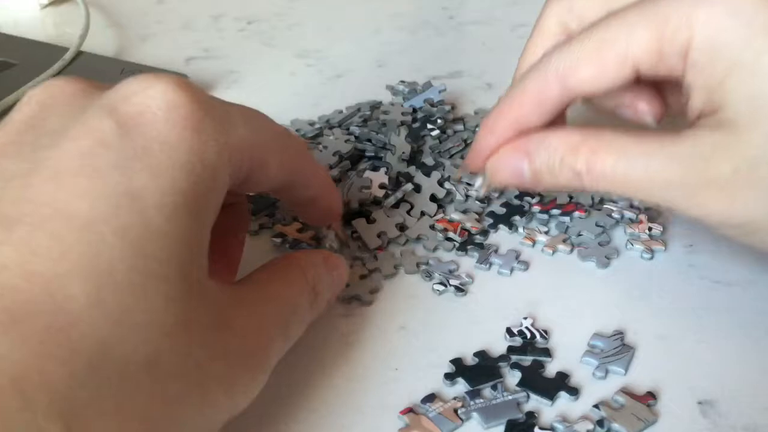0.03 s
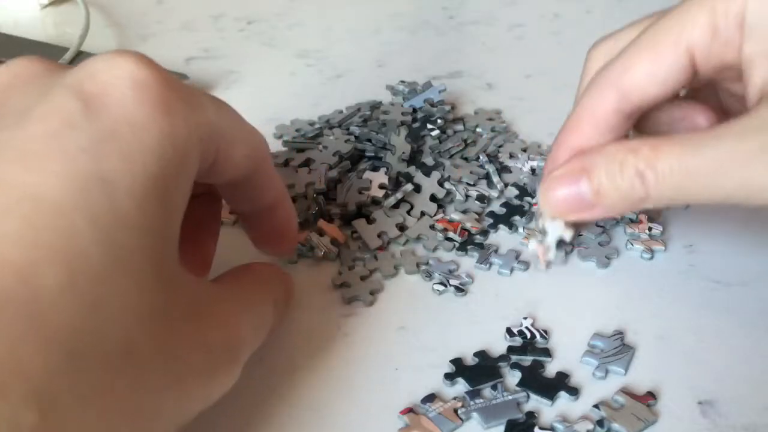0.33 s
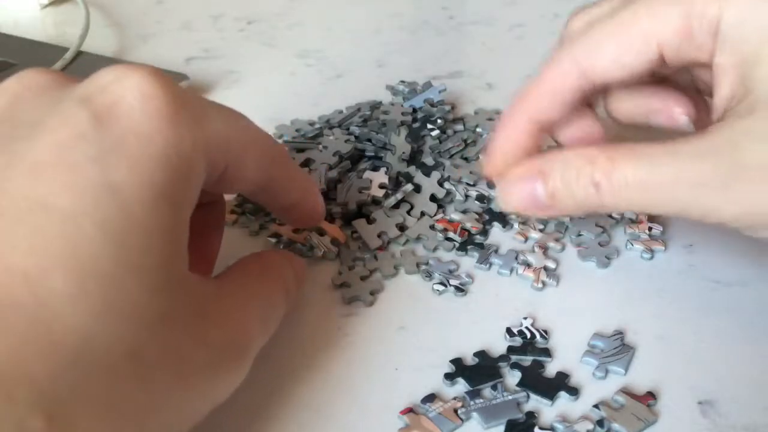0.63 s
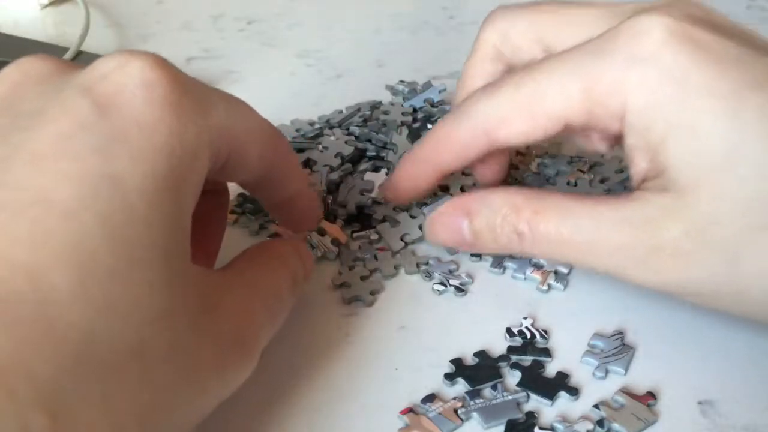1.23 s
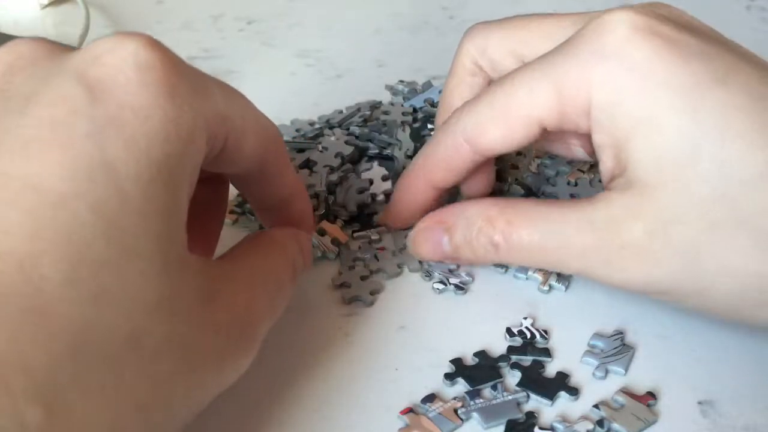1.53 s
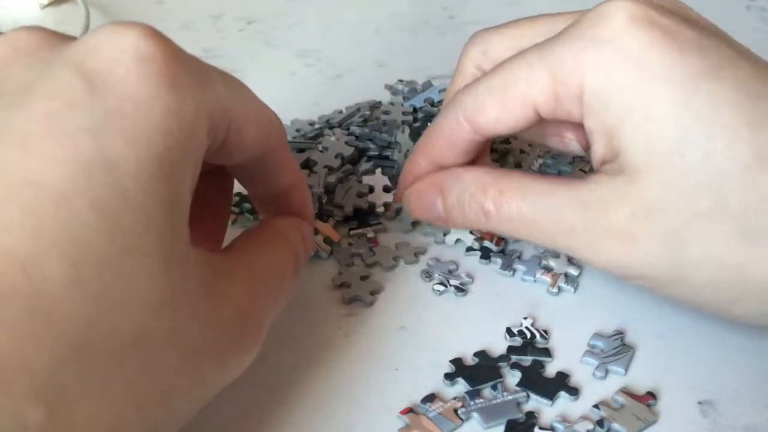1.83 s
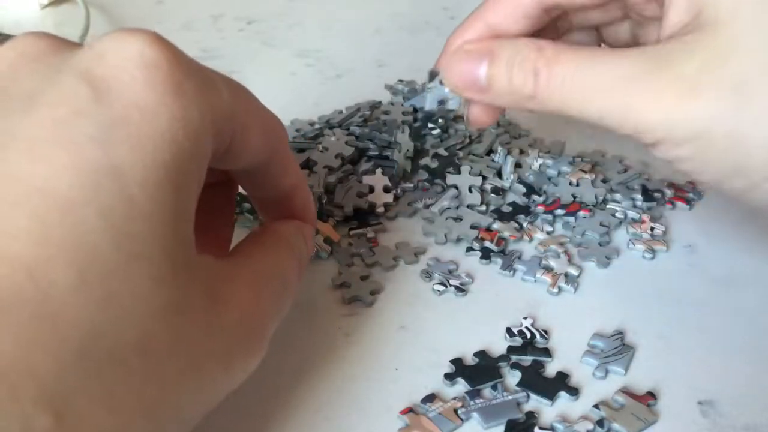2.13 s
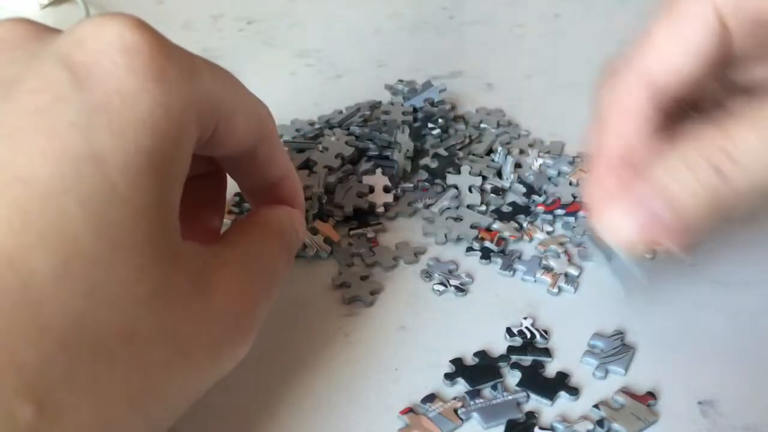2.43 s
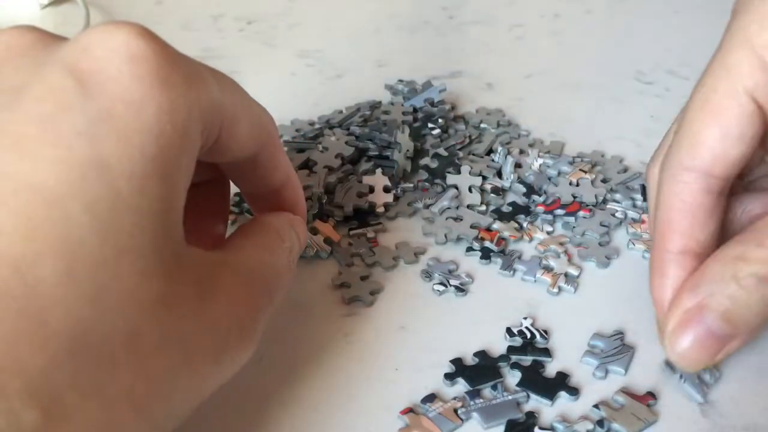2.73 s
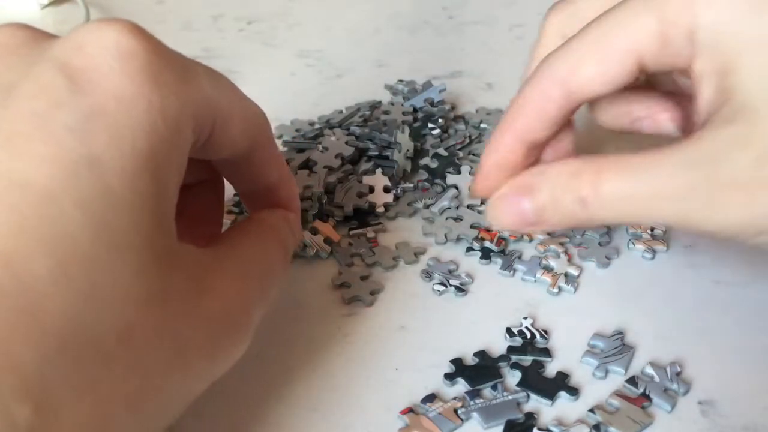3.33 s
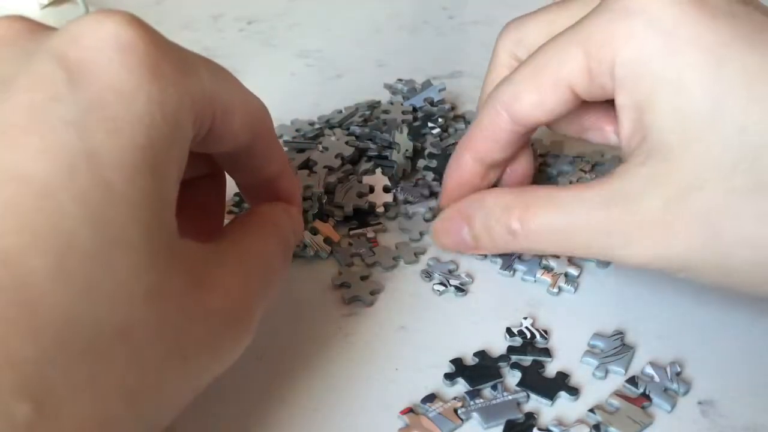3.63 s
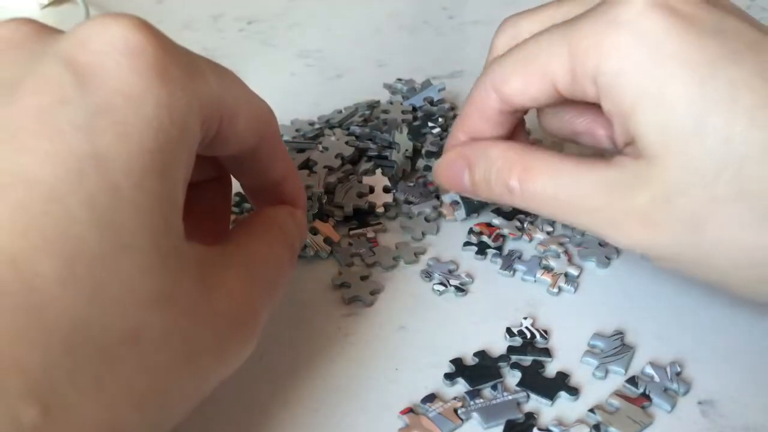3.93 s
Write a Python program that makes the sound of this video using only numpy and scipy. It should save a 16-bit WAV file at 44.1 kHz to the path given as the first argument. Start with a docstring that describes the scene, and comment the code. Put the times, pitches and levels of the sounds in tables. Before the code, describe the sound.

Small cardboard puzzle pieces click faintly as they are sorted by hand, over room hum.

```python
"""Small cardboard puzzle pieces, sorted by hand on a table close to the microphone, in a quiet room.
Very faintly they tick together, each a snap with a crackle and a ringing edge, and slide over the
heap, catching and slipping. Twice a fingertip lands and the table top gives a soft thump.
Under it all is the room tone: a low drone, appliance hum, thin hiss, a faint whine and mains buzz."""
import sys
import numpy as np
from scipy import signal
from scipy.fft import rfft, irfft
from scipy.io import wavfile
from scipy.ndimage import uniform_filter1d

SR = 44100
rng = np.random.default_rng(int(sys.argv[2]) if len(sys.argv) > 2 else 0)


def transcribe(signal):
    """Save signal, clipped to [-1, 1], as a 16-bit WAV file at the path in sys.argv[1]."""
    frames = np.atleast_2d(signal).T
    limited = np.clip(frames, -1, 1)
    pcm = np.round(limited * 32767).astype(np.int16)
    wavfile.write(sys.argv[1], SR, pcm)


N = 176400

# pieces knocking together: start_s, level_db, tilt_db_per_octave, ring_hz, ring_over_crack_db
PIECE_TICKS = [(0.412, -70, 3, 9300, -5), (.5528, -70, 7, 10400, -1), (.6939, -72, 1, 8000, -6),
               (0.9375, -55, 3.5, 6320, -7), (0.9384, -57.5, 6.5, 12800, -4), (.9720, -64, -2, 8300, -11),
               (.9967, -72, 1, 7000, -5), (1.0184, -59, 5.5, 4850, -8), (1.0327, -70, 3, 15000, -8),
               (1.047, -68, 4, 7000, -1), (1.335, -70, -2, 11000, -8), (1.4287, -65, -1, 15200, -9),
               (1.6053, -66, -2, 12000, 2), (1.606, -66.5, 2, 15300, 7), (2.0093, -67, 2, 14000, -8),
               (2.0167, -69, 2, 9000, -8), (2.6235, -75, 6, 12000, -6), (2.7922, -58, 0, 8300, -4.5),
               (2.7938, -58, 0, 10900, -5), (2.8137, -70, -5, 6540, 2), (3.4643, -66, 2, 9000, 1),
               (3.4688, -56.5, 8, 11400, -3), (3.4760, -69, -1, 12000, -6), (3.489, -71, -1, 9000, -8),
               (3.5520, -69.5, 1, 11800, 4), (3.6498, -71, 2, 9100, -4), (3.6530, -62, 3, 15200, -7),
               (3.655, -64, -1, 12900, -9), (3.9347, -69, -7, 13000, -7), (3.942, -70, 2, 12700, -14)]
# broad peaks and dips that colour every tick: frequency_hz, gain_db
TICK_COLOUR = [(400, -18), (1200, -1), (2200, 6.5), (3600, 1.5), (4500, 3), (5400, -3.5), (6500, 0),
               (7400, 1), (8600, 1.5), (10000, -4), (12400, -4), (14000, -3), (15600, -9)]
# pieces dragged over the heap: middle_s, half_length_s, level_db, centre_hz
PIECE_SLIDES = [(.14, .02, -82, 8000), (.32, .025, -81, 15000), (0.393, .015, -83, 14500),
                (.52, .04, -83, 11000), (0.987, 0.028, -81, 9500), (1.046, 0.027, -78, 10000),
                (1.346, 0.018, -76, 8500), (1.423, .008, -77.5, 12000), (1.563, .006, -79, 8000),
                (2.023, 0.02, -82, 10000), (2.34, .015, -87, 12000), (3.485, 0.018, -77, 7900)]
# fingertips landing on the table: start_s, envelope_peak_db
FINGER_THUMPS = [(1.134, -42.5), (3.119, -43.5)]
# colour of the room's drone: frequency_hz, relative_db
DRONE_SPECTRUM = [(20, -35.5), (30, -23.5), (42, -10.5), (55, -3.5), (68, 1), (82, -9), (100, -8.5),
                  (115, -10), (145, 3.5), (175, 1), (192, -5.5), (220, 3), (245, -1.5), (275, -2.5),
                  (305, -5), (340, -3), (380, -14.5), (450, -19.5), (570, -20), (690, -32), (900, -40.5),
                  (1500, -46), (3000, -97)]
# rise and fall of the drone's upper part: time_s, gain_db
UPPER_DRONE_SWELL = [(0, 8), (.16, -4.5), (.23, 4), (.45, 1), (.62, 1.5), (1.2, 1), (3.72, 0.5), (3.9, 2),
                     (4, 3)]
# hum of appliances: pitch_hz, rms_db
HUM_TONES = [(57, -68.5), (100, -66.5), (149.8, -62.5), (174, -66.5), (220, -64.5), (274, -62.5),
             (305, -63.5), (333, -63.5), (366, -76), (586, -83), (750, -88)]
# colour of the hiss: frequency_hz, relative_db
HISS_SPECTRUM = [(300, 2), (950, 1.5), (1600, -2.5), (2200, -1.5), (2800, -2.5), (3300, -7), (4300, -9),
                 (4520, -6.5), (4800, -10.5), (6400, -10.5), (7800, -16), (8450, -10), (9400, -11.5),
                 (10100, -15), (12000, -14), (14300, -19.5), (15600, -16.5)]
# thin electrical whine: pitch_hz, rms_db
WHINE_TONES = [(2195, -97), (4520, -97), (8100, -102.5), (8485, -101)]
# outline of the mains buzz: frequency_hz, typical_harmonic_rms_db
BUZZ_SPECTRUM = [(900, -103), (1350, -99), (1700, -104), (2100, -98.5), (2600, -99.5), (3050, -99.5),
                 (3500, -108), (6500, -110), (8600, -108), (9500, -115)]


def tick(level_db, tilt_db, ring_hz, ring_db, t60_s=0.008, size=2048):
    """Two pieces meet: a snap and a short crackle, with the damped ring of a cardboard edge."""
    t = np.arange(size) / SR
    contact = rng.standard_normal(size) * fade(t, t60_s)
    contact[0] = 7  # the first snap stands above the crackle
    octaves_above_1khz = np.maximum(octaves(size) - np.log2(1000), 0)
    colour_db = curve(TICK_COLOUR, size) + tilt_db * octaves_above_1khz
    crack = irfft(rfft(contact) * causal(colour_db))
    ring = np.sin(2 * np.pi * ring_hz * t) * fade(t, t60_s)
    gain = undb(level_db) * np.sqrt(SR / 1000 / size)  # level counts the crack's energy as if in 1 ms
    return gain * (unit(crack) + undb(ring_db) * unit(ring))


def ticks():
    """Pieces collide under the fingers, close to the microphone."""
    out = np.zeros(N + SR)
    for start_s, *collision in PIECE_TICKS:
        sound = tick(*collision)
        start = int(start_s * SR)
        out[start:start + len(sound)] += sound
    return out[:N]


def slides(catches_per_s=1200, scatter_db=4, width_octaves=0.8):
    """Rough card edges catch and slip many times as a piece is dragged over the heap."""
    t = np.arange(N) / SR
    out = np.zeros(N)
    for middle_s, half_length_s, level_db, centre_hz in PIECE_SLIDES:
        catches = (rng.random(N) < catches_per_s / SR) * rng.choice([-1, 1], N)
        strengths = undb(-scatter_db * rng.standard_normal(N))
        band = np.exp(-.5 * ((octaves(N) - np.log2(centre_hz)) / width_octaves) ** 2)
        scrape = unit(irfft(rfft(catches * strengths) * band, N))
        stroke = np.exp(-((t - middle_s) / half_length_s) ** 2)
        out += undb(level_db) * scrape * stroke
    return out


def reflections(sound, t60_s=.06, gain_db=-17, size=8192):
    """The table and hands scatter a short diffuse tail back to the microphone."""
    t = np.arange(size) / SR
    tail = unit(rng.standard_normal(size) * fade(t, t60_s)) / np.sqrt(size)
    return undb(gain_db) * signal.fftconvolve(sound, tail)[:N]


def thumps(pitch_hz=112.5, rise_s=0.0057):
    """A fingertip's soft push sets the table top swinging for a few cycles."""
    out = np.zeros(N)
    for start_s, peak_db in FINGER_THUMPS:
        age = np.maximum(np.arange(N) / SR - start_s, 0)
        envelope = age / rise_s * np.exp(1 - age / rise_s)
        out += undb(peak_db) * envelope * np.sin(2 * np.pi * pitch_hz * age)
    return out


def room_drone(level_db=-49, split_hz=174):
    """The room's low rumble: steady below the split, swelling and dipping above it."""
    swell_db = np.interp(np.arange(N) / SR, *np.array(UPPER_DRONE_SWELL).T)
    rumble = noise(DRONE_SPECTRUM)
    upper = irfft(rfft(rumble) * (octaves(N) > np.log2(split_hz)), N)
    lower = rumble - upper
    return undb(level_db) * (lower + undb(swell_db) * upper)


def electrical_tones(tones, drift_rad, drift_hz, waver_db=0.5):
    """Appliance hum or electrical whine: held tones that waver in level and phase."""
    t = np.arange(N) / SR
    out = np.zeros(N)
    for pitch_hz, rms_db in tones:
        gain = undb(rms_db - waver_db * waver(rate_hz=4.9))
        phase = 2 * np.pi * (pitch_hz * t + rng.random())
        out += gain * unit(np.sin(phase + drift_rad * waver(drift_hz)))
    return out


def hiss(rms_db=-72.5):
    """A thin, steady hiss behind the pieces."""
    return undb(rms_db) * noise(HISS_SPECTRUM)


def mains_buzz(mains_hz=50.02, scatter_db=3.5):
    """Faint odd harmonics of the mains, each with a strength of its own."""
    t = np.arange(N) / SR
    out = np.zeros(N)
    for pitch_hz in mains_hz * np.arange(19, 190, 2):
        typical_db = np.interp(pitch_hz, *np.array(BUZZ_SPECTRUM).T)
        rms = undb(typical_db + scatter_db * rng.standard_normal())
        out += np.sqrt(2) * rms * np.sin(2 * np.pi * (pitch_hz * t + rng.random()))
    return out


def undb(db):
    """Decibels to gain."""
    return 10 ** (np.asarray(db) / 20)


def unit(x):
    """Scale to rms 1."""
    return x / np.sqrt(np.mean(x ** 2) + 1e-30)


def octaves(size):
    """Log2 frequency of each spectral bin."""
    return np.log2(np.maximum(np.fft.rfftfreq(size, 1 / SR), 1))


def curve(points, size):
    """Level in dB at each bin, drawn through (Hz, dB) points."""
    hz, db = np.array(points).T
    return np.interp(octaves(size), np.log2(hz), db)


def noise(spectrum):
    """Noise of a given colour, rms 1."""
    white = rng.standard_normal(N)
    return unit(irfft(rfft(white) * undb(curve(spectrum, N)), N))


def waver(rate_hz):
    """Smoothed random steps, rms 1."""
    hold = int(SR / rate_hz)
    steps = rng.standard_normal(256)[np.arange(N) // hold % 256]
    return unit(uniform_filter1d(uniform_filter1d(steps, hold), hold))


def causal(db):
    """Minimum-phase response with the given levels: nothing sounds before the hit."""
    cepstrum = irfft(np.log(undb(db)))
    half = len(cepstrum) // 2
    cepstrum[1:half] *= 2
    cepstrum[half + 1:] = 0
    return np.exp(rfft(cepstrum))


def fade(t, t60_s):
    """Exponential decay, 60 dB down after t60_s."""
    return np.exp(-np.log(1000) * t / t60_s)


def scene():
    """One microphone close to the pieces on the table, with the room tone behind them."""
    room_tone = room_drone()
    room_tone += electrical_tones(HUM_TONES, drift_rad=0.34, drift_hz=3.81)
    room_tone += hiss()
    room_tone += electrical_tones(WHINE_TONES, drift_rad=0.77, drift_hz=99)
    room_tone += mains_buzz()
    pieces = ticks() + slides()
    return (pieces + reflections(pieces) + thumps() + room_tone)[None]


def record(dry, cutoff_hz=15850):
    """The recorder cuts the top treble steeply."""
    lowpass = signal.ellip(10, .2, 70, cutoff_hz, fs=SR, output="sos")
    return signal.sosfilt(lowpass, dry)


dry = scene()
out = record(dry)
transcribe(out)
```